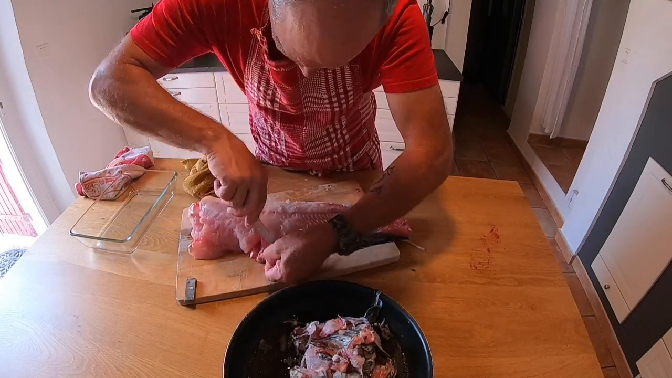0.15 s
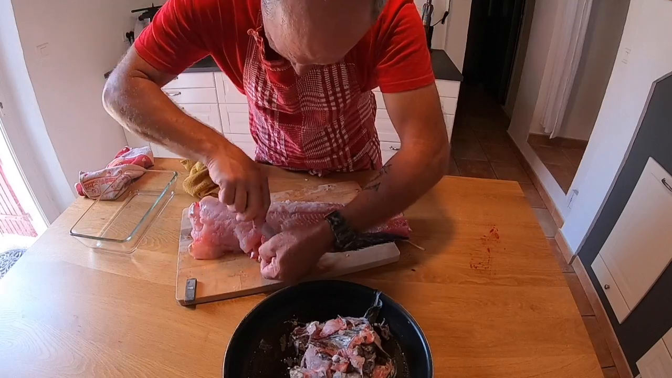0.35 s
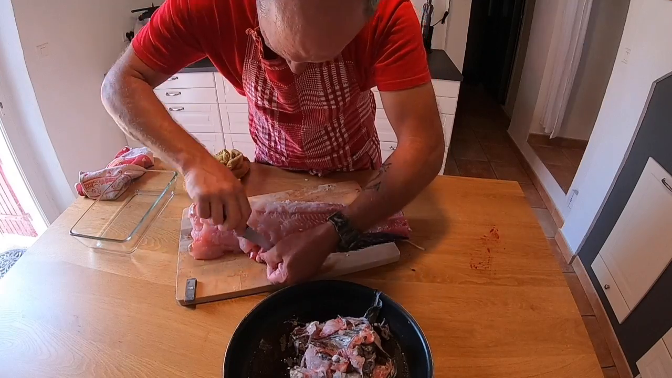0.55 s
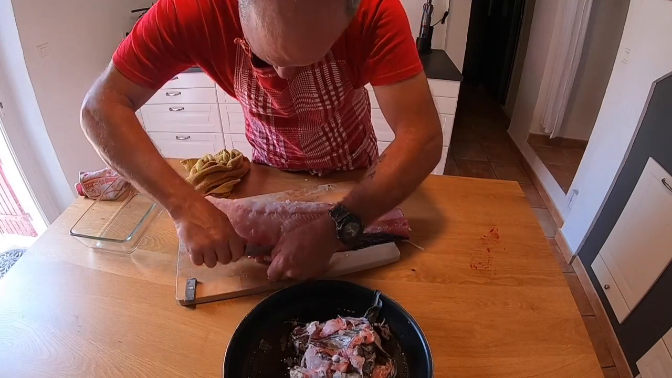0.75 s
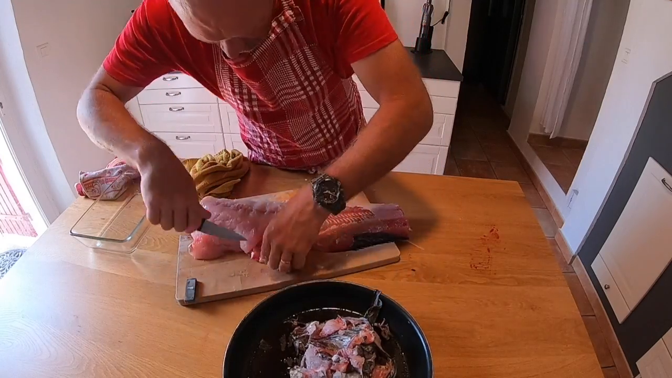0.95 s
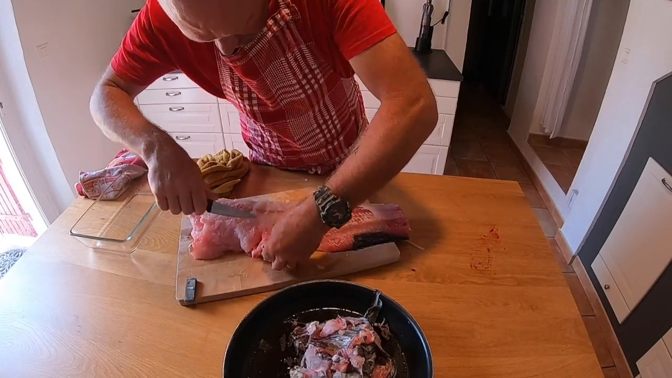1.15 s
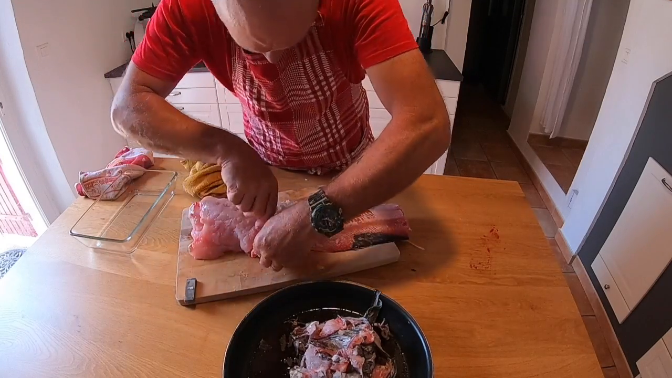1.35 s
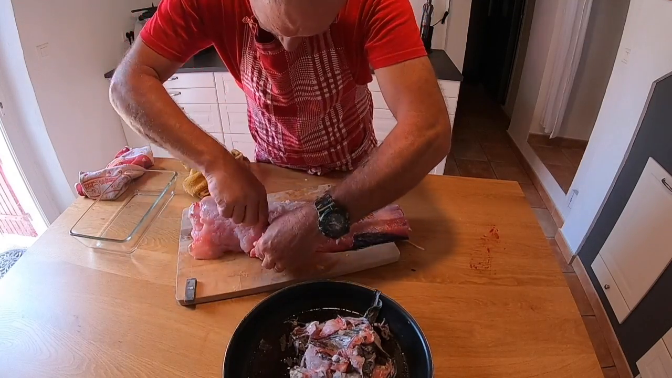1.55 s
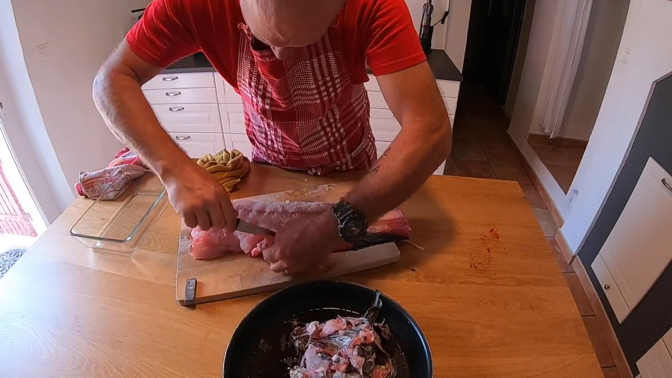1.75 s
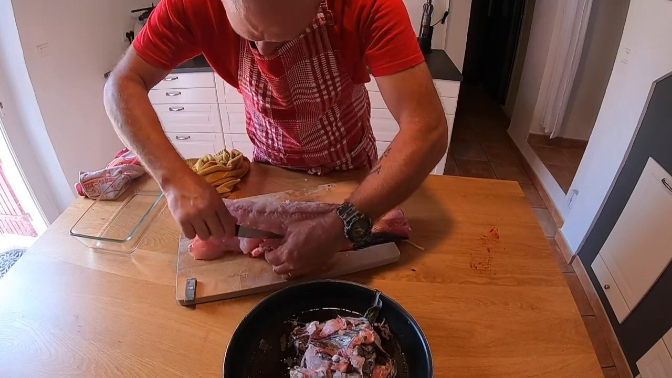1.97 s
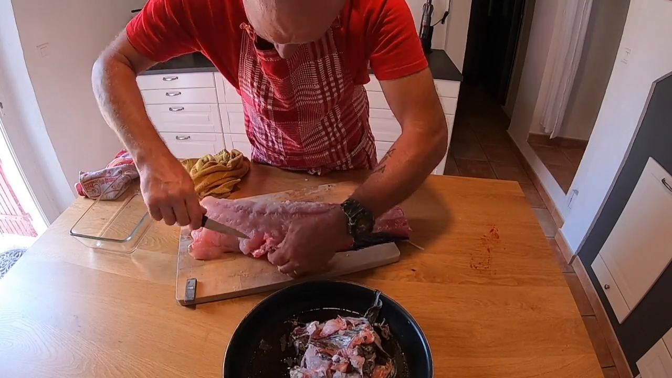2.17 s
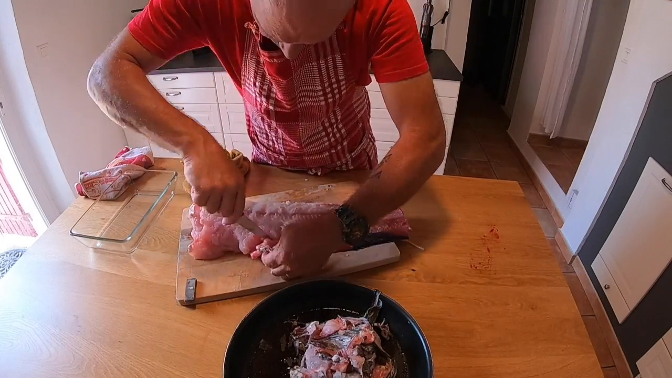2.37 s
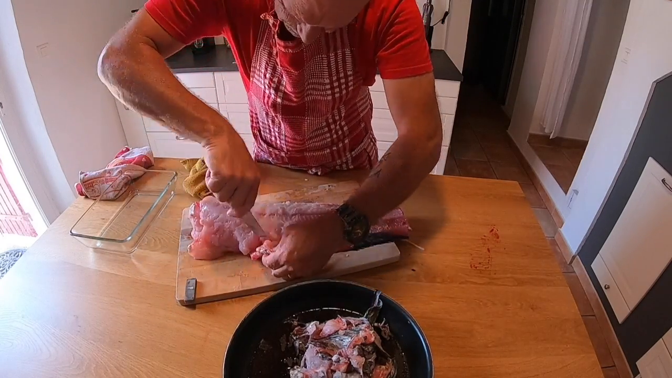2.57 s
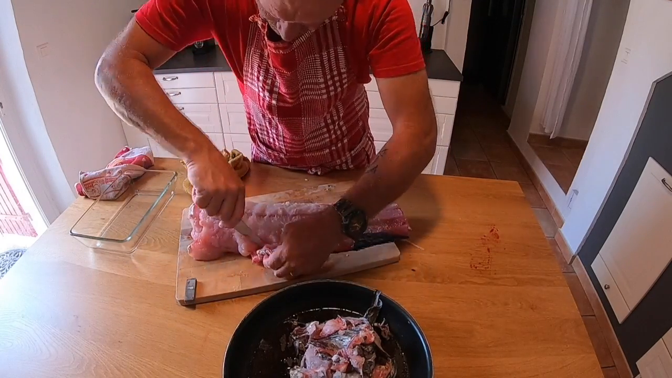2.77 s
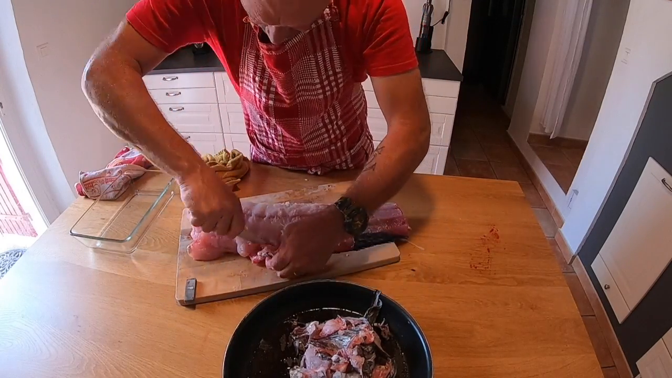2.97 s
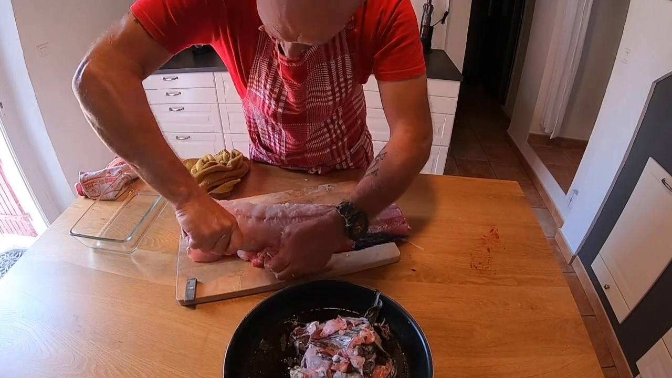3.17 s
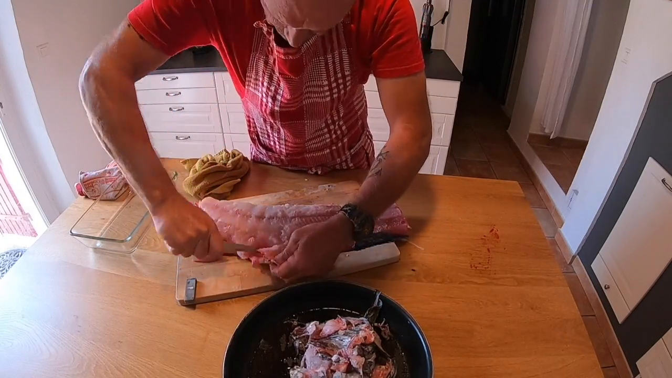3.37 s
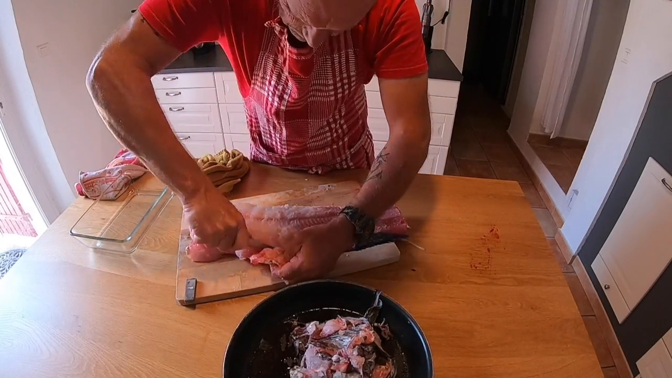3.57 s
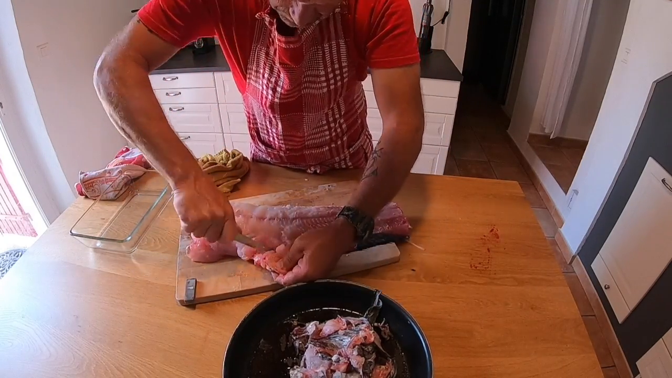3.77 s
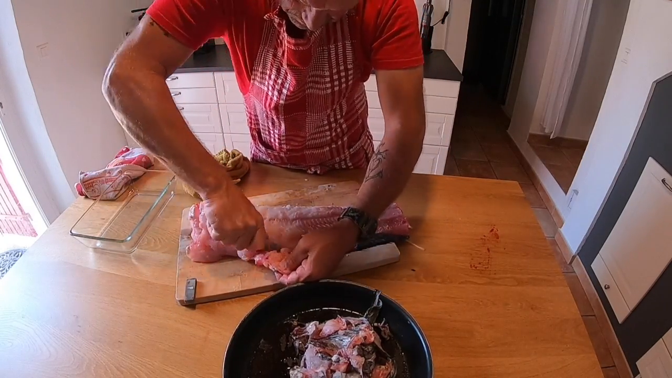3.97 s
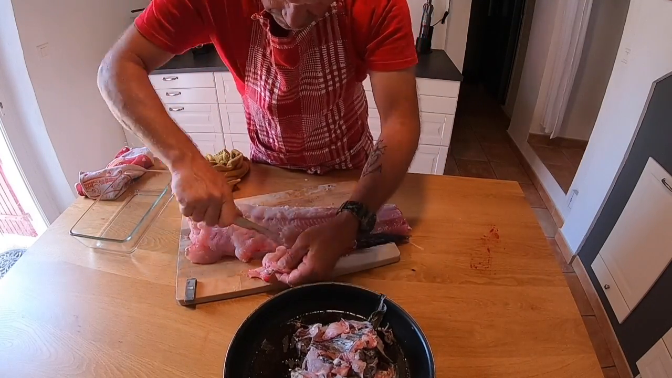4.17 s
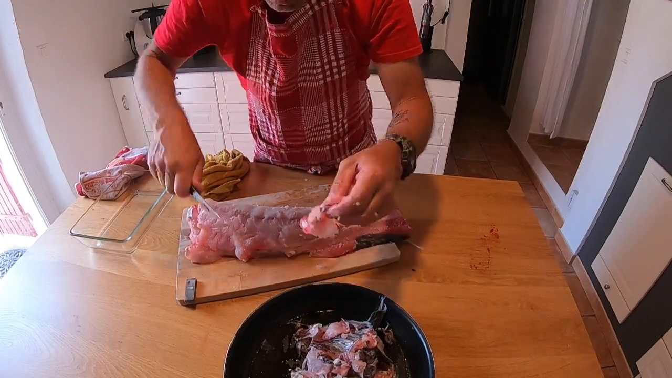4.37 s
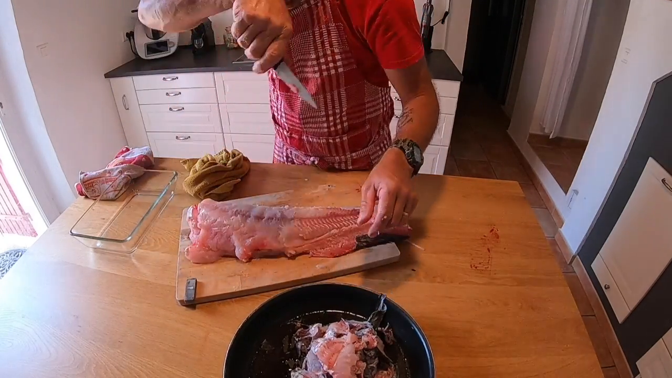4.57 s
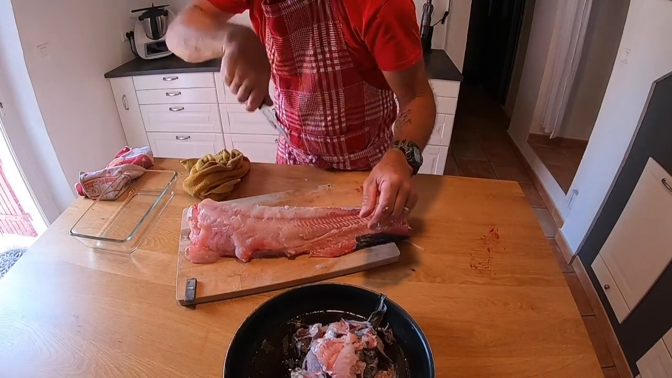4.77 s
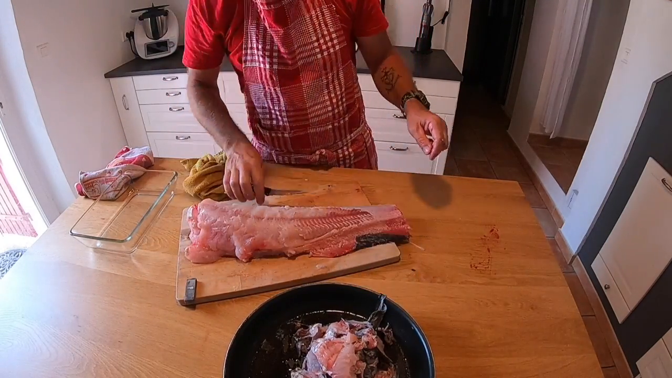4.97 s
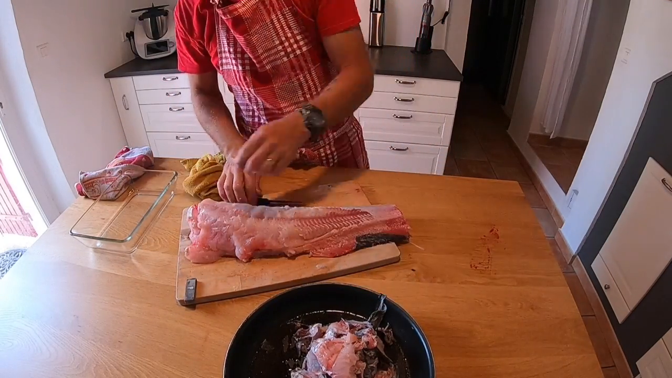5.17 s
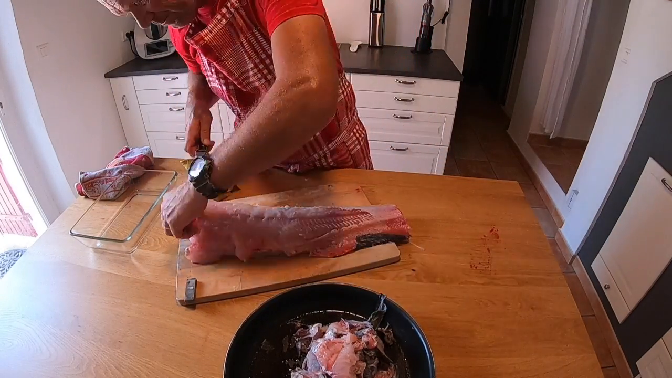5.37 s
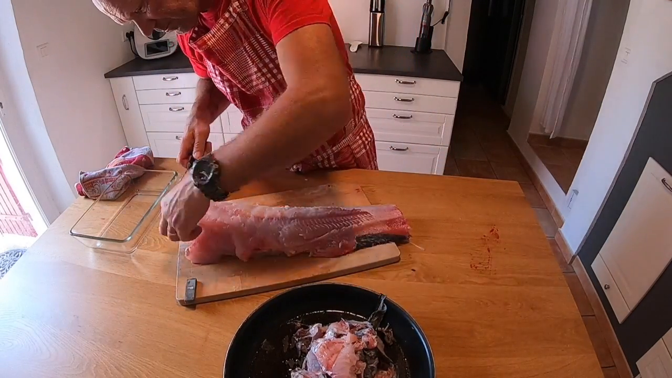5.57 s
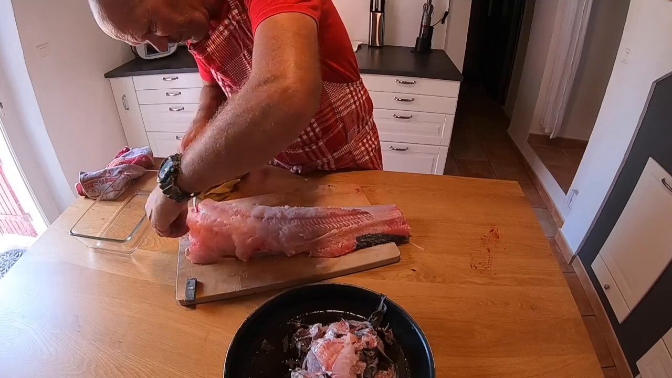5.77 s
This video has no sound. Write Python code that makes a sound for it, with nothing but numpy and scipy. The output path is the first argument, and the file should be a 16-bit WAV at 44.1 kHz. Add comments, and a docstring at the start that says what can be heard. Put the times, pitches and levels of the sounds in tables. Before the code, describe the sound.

In a quiet home kitchen, a knife works at fish on a board: faint clicks and wet rubbing first, then irregular hard knocks, crunches and treble ticks in the middle. It calms, and at five seconds the knife drops onto the table, the loudest sound, ringing briefly with softer bounces. A soft stroke and tiny squeak finish. Near stereo microphone, lean in lows, steady low hiss and faint appliance tones.

```python
"""A knife works the skin off a fish on a wooden board in a quiet kitchen, over faint hiss and appliance whine.
From the start wet scraping (noise of sparse grains) mixes with knocks (clicks and rattles into board modes).
Around 2.2 to 4.4 s come the strongest knocks, with thin treble snaps of skin among them.
At 5 s the knife is laid down with a clatter of ringing modes; a last soft stroke and a short squeak follow.
The near sounds get a small room and lose most below about 500 Hz; gain control and a treble cut end the chain."""
import sys
import numpy as np
from scipy import signal
from scipy.fft import rfft, irfft, next_fast_len
from scipy.io import wavfile
from scipy.ndimage import uniform_filter1d

SR = 44100
rng = np.random.default_rng(int(sys.argv[2]) if len(sys.argv) > 2 else 0)


def put_to_file(sound):
    """Save the sound as 16-bit audio at rate SR, in the file named by the first command-line argument."""
    columns = np.atleast_2d(sound).T  # one column per channel
    safe = np.clip(columns, -1, 1)
    whole_steps = np.round(safe * 32767)
    wavfile.write(sys.argv[1], SR, whole_steps.astype(np.int16))


N = 256865   # samples
# Near sounds are levelled ahead of the bass shelf;
# hiss and whine skip the shelf and meet only the gain control and treble cut.


def from_db(db):
    """Decibels to gain."""
    return 10 ** (np.asarray(db) / 20)


def rms_one(x):
    """Scale to rms 1."""
    return x / np.sqrt(np.mean(x ** 2) + 1e-20)


def at_hz(points, hz):
    """Read a frequency table on a log axis."""
    table = np.array(points)
    return np.interp(np.log(hz + 1), np.log(table[:, 0]), table[:, 1])


def colour(x, spectrum):
    """Minimum-phase filter with the shape of the spectrum, scaled to gain 1 for white noise."""
    size = 2048
    log_gain = np.log(from_db(at_hz(spectrum, np.fft.rfftfreq(size, 1 / SR))))
    cepstrum = irfft(log_gain)
    cepstrum[1:size // 2] *= 2   # folding the cepstrum makes the filter causal
    cepstrum[size // 2 + 1:] = 0
    taps = irfft(np.exp(rfft(cepstrum)))[None, :size // 2]
    taps = taps / np.sqrt(np.sum(taps ** 2))
    return signal.fftconvolve(x, taps, axes=1)[:, :x.shape[1]]


def drift(rate_hz):
    """Slow random wander of rms 1: low-passed noise, computed at every 40th sample."""
    step = 40
    r = np.exp(-2 * np.pi * step * rate_hz / SR)
    noise = rng.standard_normal(N // step + 2002)
    slow = signal.lfilter([1], [1, -2 * r, r * r], noise)[2000:]   # skip the filter's start
    return np.interp(np.arange(N) / step, np.arange(len(slow)), rms_one(slow))


def grains(per_s, spread_db, size):
    """Random clicks of uneven strength and sign, rms 1; row 0 common to both ears, row 1 scattered."""
    shape = (2, size)
    strength = from_db(spread_db * np.minimum(rng.exponential(1, shape), 4))
    sign = rng.choice([-1, 1], shape)
    return rms_one(strength * sign * (rng.random(shape) < per_s / SR))


def contact(t60, per_s, rattle_db, hold_s):
    """One blow: a first click, then a rattle of smaller contacts that holds a moment and dies."""
    size = SR // 5
    late = np.maximum(np.arange(size) / SR - hold_s, 0)
    decay = from_db(-60 * late / max(t60, .005))
    force = from_db(rattle_db) * grains(per_s, 1.45, size) * decay
    force[0, 0] = force[1, 14] = 1   # the first click comes straight, its scatter just after
    return force


def ring(force, modes, spread_db):
    """Damped resonators driven by the blow, each mode with a chance strength of its own."""
    out = 0
    for (hz, level_db, t60), chance in zip(modes, rng.standard_normal(len(modes))):
        r = from_db(-60 / (t60 * SR))
        w = 2 * np.pi * hz / SR
        rung = signal.lfilter([0, np.sin(w)], [1, -2 * r * np.cos(w), r * r], force + 1e-18)
        out = out + from_db(level_db + spread_db * chance) * rung
    return out


def add(track, s, sound, peak_db):
    """Mix a sound in at a time; its loudest 4 ms match a sine of the given peak level."""
    at = round(s * SR)
    top = np.sqrt(2 * uniform_filter1d(sound[0] ** 2, size=176).max())
    track[:, at:at + sound.shape[1]] += (from_db(peak_db) / top * sound)[:, :N - at]


# Room and microphone noise: (frequency [Hz], relative density [dB per Hz])
HISS_SPECTRUM = [(15, -67), (25, -29), (53, -22.5), (220, -25.5), (399, -24.5), (470, -63), (510, -31),
                 (553, -10), (766, -5.5), (952, -12), (1150, -9), (1360, -13), (2400, -13), (3200, -9),
                 (4000, -11), (5270, -9), (7600, -11), (14400, -27.5), (16500, -53)]
# Left-right likeness of the hiss: (frequency [Hz], correlation [-1 to 1])
HISS_LIKENESS = [(60, 0.75), (120, 0.032), (240, 0.62), (480, -0.92), (950, 0.0016), (1890, 0.41),
                 (3770, 0.078), (7520, 0.37), (15000, 0.99)]
HISS_DB = -57   # rms


def hiss():
    """Smooth noise built from a mid and a side part, so the ears are alike only in part."""
    hz = np.fft.rfftfreq(N, 1 / SR)
    alike = np.clip(at_hz(HISS_LIKENESS, hz), -1, 1)
    mid, side = rfft(rng.standard_normal((2, N)))
    pair = np.sqrt(1 + alike) * mid + np.sqrt(1 - alike) * side * [[1], [-1]]
    return from_db(HISS_DB) * rms_one(irfft(pair * from_db(at_hz(HISS_SPECTRUM, hz)), N))


# Appliance tones: (frequency [Hz], level [dB rms, before wavering], left-right likeness [0 to 1])
WHINE_TONES = [(61, -99, 0.5), (265, -93, 0.79), (290, -105, 0.68), (514, -82, 0.99), (570, -77.5, 0.13),
               (806, -84, 0.16), (997, -76, 0.38), (1180, -67, 1), (1198, -77, 0.8), (1273, -73.5, 0.93),
               (1547, -80.5, 1)]


def wavering_tone(hz):
    """A sine from a chance phase whose level and phase drift a little."""
    t = np.arange(N) / SR
    level = from_db(1.5 * drift(9))
    return level * np.sin(2 * np.pi * (hz * t + rng.random()) + .6 * drift(3))


def whine():
    """Continuous tones; the part that differs between the ears wavers on its own."""
    out = np.zeros((2, N))
    for hz, level_db, alike in WHINE_TONES:
        mid, side = wavering_tone(hz), wavering_tone(hz)
        alike = np.clip(alike, 0, 1)
        pair = np.sqrt(1 + alike) * mid + np.sqrt(1 - alike) * side * [[1], [-1]]
        out += from_db(level_db) * pair
    return out


KITCHEN_T60_S, WALL_CUT_HZ = 0.12, 28000   # decay at the lowest pitch; frequency where it has halved


def kitchen(x):
    """Twelve feedback delays, duller on every round."""
    size = next_fast_len(N + SR)
    hz = np.fft.rfftfreq(size, 1 / SR)
    t60 = KITCHEN_T60_S / (1 + hz / WALL_CUT_HZ)
    walls = 0
    for k, lag_s in enumerate(rng.uniform(0.0059, 0.022, size=12)):
        echo = from_db(-60 * lag_s / t60) * np.exp(-2j * np.pi * hz * lag_s)
        walls = walls + (-1) ** k * echo / (1 - echo)   # the sum of all rounds
    return irfft(walls * rfft(x, size), size)[:, :N]


SQUEAK_S, SQUEAK_HZ, SQUEAK_DB = 5.632, 2470, -49   # time, pitch and rms level at its loudest
SQUEAK_SAG_HZ_PER_S, SQUEAK_RISE_DB_S, SQUEAK_FALL_DB_S = 2500, 1900, 900


def squeak():
    """A near-pure tone that swells and fades, sagging in pitch."""
    late = np.arange(N) / SR - SQUEAK_S
    level_db = SQUEAK_DB + np.minimum(SQUEAK_RISE_DB_S * late, -SQUEAK_FALL_DB_S * late)
    cycles = SQUEAK_HZ * late - SQUEAK_SAG_HZ_PER_S * late ** 2 / 2
    phase = [[0], [np.pi / 2]]   # common part, scattered part
    return from_db(level_db) * np.sqrt(2) * np.sin(2 * np.pi * cycles + phase)


# The knife meets the table and bounces: (time [s], ring peak [dB], crack re ring [dB],
# decay of the crack's rattle [s to -60 dB], tilt of the ring [dB per octave])
LAY_DOWN = [(5.0409, -19.5, 3.5, 0.14, 3), (5.1335, -39.5, -0.5, 0.063, -6), (5.246, -53, -11, 0.11, -2)]
# Ringing modes of the knife: (frequency [Hz], relative level [dB], decay [s to -60 dB])
KNIFE_MODES = [(243, 2.5, 0.041), (746, -13, 0.08), (827, -4, 0.087), (1137, -5, .09), (1232, -4, 0.15),
               (1250, 6.5, 0.092), (1550, -0.5, 0.053), (1944, -4, 0.072), (2830, -23, 0.14),
               (3370, -25, 0.11), (3550, -10.5, 0.11), (4070, -4.5, 0.16), (4150, -19, 0.11),
               (4740, -18, 0.081), (5680, -4, 0.036), (5300, -6, 0.044), (5960, -19, 0.072),
               (6210, -11, 0.11), (7440, -6, 0.036), (8500, -8, 0.023), (8700, -3, 0.0057),
               (8920, 2.5, 0.01)]
# Colour of the table crack: (frequency [Hz], relative density [dB per Hz])
TABLE_CRACK = [(88, -82), (150, -44), (696, -43), (783, -14), (1250, -8), (1750, -16.5), (4000, -12),
               (5070, -9), (9700, -16.5), (15000, -29), (16500, -59)]


def knife_laid_down():
    """Handle and blade clatter on the table top; the bounces are softer and duller."""
    out = np.zeros((2, N))
    for s, ring_db, crack_db, t60, tilt_db in LAY_DOWN:
        force = contact(0.53 * t60, 9000, rattle_db=-26.5, hold_s=0.0182)
        tilt = [(1500, 0), (12000, 3 * tilt_db)]   # three octaves
        add(out, s, colour(ring(force, KNIFE_MODES, spread_db=1), tilt), ring_db)
        rattle = contact(t60, 12000, rattle_db=-25, hold_s=0.017)
        add(out, s, colour(rattle, TABLE_CRACK), ring_db + crack_db)
    return out


# Wet skin snapping free: (time [s], peak [dB])
SNAPS = [(2.239, -57), (2.491, -50.5), (2.6798, -58.5), (2.7018, -62), (2.7504, -42.5), (2.8769, -49.5),
         (3.1015, -44), (3.1163, -41.5), (3.126, -48), (3.2427, -43.5), (3.2555, -53), (3.2774, -51),
         (3.3902, -44.5), (3.6366, -53), (3.7944, -49), (3.8806, -53), (5.341, -52.5)]
SNAP_T60_S, SNAP_EDGE_HZ = 0.084, 9000   # decay of the fizz; full level above this


def snaps():
    """Thin ticks with a short fizz of small contacts, treble only."""
    out = np.zeros((2, N))
    treble = [(SNAP_EDGE_HZ / 3, -25), (SNAP_EDGE_HZ, 0), (15600, 0), (16200, -30)]
    for s, peak_db in SNAPS:
        fizz = contact(SNAP_T60_S, 1800, rattle_db=-21, hold_s=.004)
        add(out, s, colour(fizz, treble), peak_db)
    return out


# Blade and board knocks: (time [s], crunch peak [dB], deep thud re crunch [dB], upper thud re crunch [dB],
# crack re crunch [dB], tilt of crunch and ring [roughly dB per octave])
KNOCKS = [(0.042, -53, -11, -20, -18, 6), (0.137, -49, -7, -12, -14, -1), (0.197, -57, 2, 4, 5, 0),
          (0.397, -58.5, -5, -3, -1, -2.1), (0.447, -61.5, -8, -16, 15, 1), (0.455, -56.5, 2, -2, 2, 9),
          (0.63, -46, -12, -25, 4, 0), (0.838, -61.5, -13, -9, 1, 5), (1.687, -55.5, -19, -23, 9, 1.5),
          (1.904, -58.5, -9, -24, 11.5, 5), (2.171, -60, -13, -25, 14.5, 7),
          (2.531, -31.5, 11.5, 5, 5.5, 1.8), (2.588, -56.5, 15, 13, 11, 2),
          (2.641, -42.5, -1, -2, -3.5, -7.5), (2.71, -47, 1, -1, -3, 4), (2.722, -56.5, 14, 11.5, 6, .1),
          (2.8199, -37, -11, -6, 4.5, -1), (2.885, -44, -6, -9, -6, -5), (3.031, -38.5, 11.5, 7, 7.5, -3.7),
          (3.04, -28.5, -5, -4, -1.7, -3.5), (3.187, -39, 11.5, 5.5, 9, 4.5), (3.206, -42.5, 6, 3, 9.5, 2),
          (3.338, -43.5, -9, -28, 6.5, -0.7), (3.538, -44.5, -11, -17, -3, 1.3),
          (3.643, -52.5, 14, 6.5, -15, -6), (3.702, -54, -8, 1, -16, 1), (3.717, -28, 2, 2.5, 6.5, 2.6),
          (3.965, -48.5, -12, -13, -14, 3.5), (4.032, -51, -5, -16, 9.5, 1), (4.074, -42, 4.5, -1, 3, -1.5),
          (4.108, -44.5, -5, -6, -10, 1.5), (4.127, -48, -7, -14, -3, -5), (4.2798, -39, -12, -7, -12, 3.7),
          (4.335, -38.5, -3, -4, 3.5, 1), (4.35, -34, -24, -28, -7, 4)]
# The board rocking on the table, deep then upper: (frequency [Hz], decay of each pass [s to -60 dB])
THUD_MODES = [(222, 0.04), (492, 0.036)]
# Ringing modes of the board: (frequency [Hz], relative level [dB], decay [s to -60 dB])
BOARD_MODES = [(610.4, -8.5, 0.18), (699, 1.5, 0.068), (794, -20, 0.011), (995, -5, 0.042),
               (1153, -8.5, 0.2), (1365, -2.5, 0.12), (1536, 1.5, 0.091), (1714, -2.5, 0.073),
               (2018, -7, 0.095), (2420, -21, 0.043), (2894, 11, 0.0038), (3290, -2, 0.052),
               (3220, -7, .04), (4180, -22, .04)]
# Colour of the bright crack: (frequency [Hz], relative density [dB per Hz])
KNOCK_CRACK = [(1470, -35.5), (2500, -4), (3130, -3), (3850, -8.5), (5550, -6), (7940, -8), (13800, -8.5),
               (15900, -8.5), (16800, -34)]
RING_DB = -1.5   # ring of the board re crunch
# how fast the rattle behind each part of a knock dies
THUD_T60_S, RING_T60_S, CRUNCH_T60_S, CRACK_T60_S = 0.017, 0.042, 0.11, 0.11


def knocks():
    """Each blow gives a soft thud of the rocking board, a damped crunch, some ring and a bright crack."""
    out = np.zeros((2, N))
    for s, crunch_db, deep_db, upper_db, crack_db, tilt_db in KNOCKS:
        tilt = [(200, 3.0 - 2 * tilt_db), (600, -tilt_db), (1500, 0.0049),
                (3300, tilt_db - 8.5), (8000, 2 * tilt_db - 35)]

        blow = contact(THUD_T60_S, 8000, rattle_db=-30, hold_s=.004)
        push = signal.lfilter([1], [1, -1.8, .81], blow)   # a soft contact favours the lows
        for (hz, ring_s), thud_db in zip(THUD_MODES, (deep_db, upper_db)):
            mode = [(hz, 0, ring_s)]   # rung through twice: the thud swells before it dies
            thud = ring(ring(push, mode, spread_db=0), mode, spread_db=0)
            add(out, s, thud, crunch_db + thud_db)

        force = contact(RING_T60_S, 8000, rattle_db=-21, hold_s=0.0049)
        board = ring(force, BOARD_MODES, spread_db=0.5)
        add(out, s, colour(board, tilt), crunch_db + RING_DB)

        crunch = contact(CRUNCH_T60_S, 8000, rattle_db=-19, hold_s=0.005)   # flesh damps the board
        add(out, s, colour(crunch, tilt), crunch_db)

        crack = contact(CRACK_T60_S, 5000, rattle_db=-21, hold_s=0.004)
        add(out, s, colour(crack, KNOCK_CRACK), crunch_db + crack_db)
    return out


# Strokes of blade and fingers on wet flesh: (time of the peak [s], length [s],
# fine crackle at the peak [dB rms], dull rub at the peak [dB rms]), before the flutter
STROKES = [(0.104, 0.084, -59.5, -73), (0.139, 0.08, -71, -54.5), (0.198, 0.11, -56, -60),
           (0.357, .1, -62, -82.5), (.41, .07, -74, -61.5), (0.464, 0.074, -48, -51),
           (0.633, 0.065, -49, -58), (0.765, 0.076, -70, -58.5), (0.82, 0.9, -66, -65),
           (1.064, 0.3, -64, -70), (1.347, .07, -60, -79), (1.437, 0.38, -66, -63.5),
           (1.604, 0.17, -64, -61), (1.698, .1, -55.5, -65), (1.85, .08, -60, -82), (1.896, .1, -60, -78),
           (2.11, 0.26, -61, -63), (2.186, 0.13, -62, -65), (2.355, 0.16, -63, -81), (2.48, 0.23, -71, -64),
           (2.71, 0.55, -59, -59.5), (3.244, 0.39, -58, -60), (3.73, 0.68, -61.5, -67),
           (4.035, 0.049, -48, -63), (4.099, 0.11, -48.5, -88.5), (4.335, 0.093, -45, -70),
           (4.502, .4, -77, -67), (4.926, 0.53, -70, -78), (5.51, 0.88, -67, -70)]
RISE_SHARE, STROKE_ENDS_DB = 0.44, -17.5   # part of a stroke before its peak; level at its ends re peak
REST_CRACKLE_DB, REST_RUB_DB = -81, -74.5   # the hands are never quite still


def stroke_gains():
    """Each stroke swells and fades straight in dB; powers add over a low rest level."""
    t = np.arange(N) / SR
    power = from_db([[REST_CRACKLE_DB], [REST_RUB_DB]]) ** 2
    for s, length_s, crackle_db, rub_db in STROKES:
        # 0 at the peak, 1 at either end
        away = np.maximum((s - t) / RISE_SHARE, (t - s) / (1 - RISE_SHARE)) / length_s
        swell = from_db(STROKE_ENDS_DB * np.minimum(away, 9))
        power = power + (from_db([[crackle_db], [rub_db]]) * swell) ** 2
    return np.sqrt(power)


def scraping():
    """Wet skin parts with a fine crackle of separate ticks; hands rub dully on flesh and wood."""
    crackle_gain, rub_gain = stroke_gains()
    bright = [(2000, -13), (8000, 1.5), (12500, 2.5), (15600, 3.5), (16200, -29)]
    dull = [(300, -18.5), (700, 7.5), (1500, -8.0), (4000, -17.0), (9000, -17)]
    crackle = colour(grains(3500, 3.5, N), bright)
    rub = colour(grains(1500, 3.1, N), dull)
    crackle_flutter, rub_flutter = from_db(1.5 * drift(30)), from_db(1.5 * drift(15))
    return crackle_gain * crackle_flutter * crackle + rub_gain * rub_flutter * rub


STEP_HZ, STEP_DB = 475, -18   # the bass shelf of the microphones


def bass_shelf(x):
    """Sound under the step passes only weakly, the deep bass hardly at all."""
    x = signal.sosfilt(signal.butter(6, 175, "high", fs=SR, output="sos"), x)
    above = signal.sosfilt(signal.ellip(4, .5, 30, STEP_HZ, "high", fs=SR, output="sos"), x)
    return from_db(STEP_DB) * x + (1 - from_db(STEP_DB)) * above


# Scattered part of near sounds, which differs between the ears: (frequency [Hz], gain [dB])
SCATTER_GAIN = [(60, -4), (120, -2), (240, -18), (480, -23), (950, -35), (1890, -12), (3770, -4.5),
                (7520, -3), (15000, -10.5)]


def at_microphones(common, scattered):
    """The scattered part, weakest near 1 kHz, reaches the two ports with opposite sign."""
    hz = np.fft.rfftfreq(N, 1 / SR)
    side = irfft(rfft(scattered) * from_db(at_hz(SCATTER_GAIN, hz)), N)
    return common + side * [[1], [-1]]


def scene():
    """Near sounds with their room through the bass shelf, over hiss and whine."""
    near = knocks() + snaps() + knife_laid_down() + scraping() + squeak()
    with_room = near + from_db(-18.5) * kitchen(near)
    return at_microphones(*bass_shelf(with_room)) + hiss() + whine()


# gain control: threshold, dB taken per dB above it, release
DUCK_FROM_DB, DUCK_SHARE, RECOVER_DB_S = -54, 0.08, 3
CUTOFF_HZ = 16900


def record(dry):
    """Gain control ducks for loud sound and recovers at a steady rate; the top is cut."""
    power = uniform_filter1d(np.mean(dry ** 2, axis=0), size=441)   # over 10 ms
    level_db = 10 * np.log10(power + 1e-12)
    wanted_db = DUCK_SHARE * np.maximum(level_db - DUCK_FROM_DB, 0)
    ramp = RECOVER_DB_S * np.arange(N) / SR
    duck_db = np.maximum.accumulate(wanted_db + ramp) - ramp   # rises at once, falls along the ramp
    gain = from_db(-signal.lfilter([.002], [1, -.998], duck_db))   # smoothed over about 11 ms
    return signal.sosfilt(signal.cheby2(12, 70, CUTOFF_HZ, fs=SR, output="sos"), gain * dry)


dry = scene()
out = record(dry)
put_to_file(out)
```